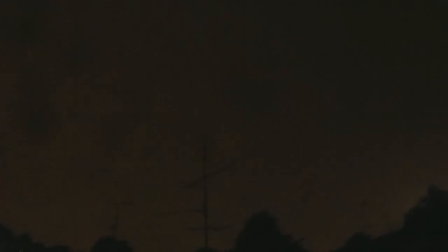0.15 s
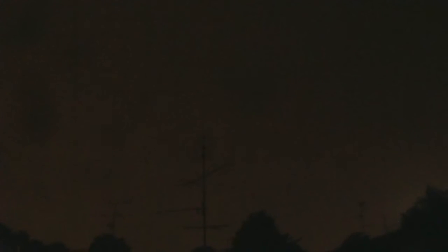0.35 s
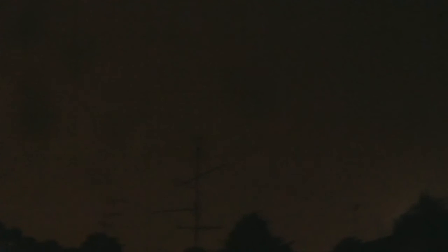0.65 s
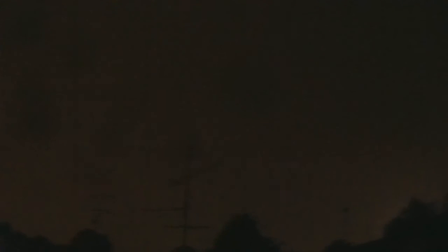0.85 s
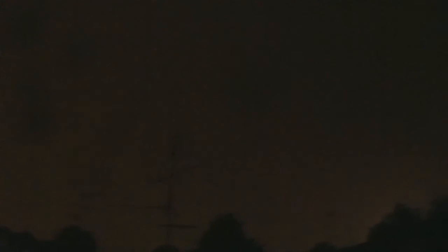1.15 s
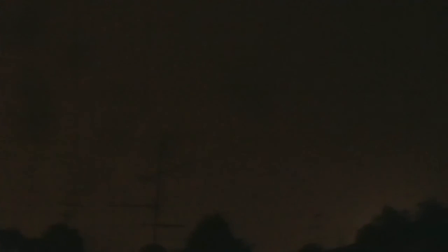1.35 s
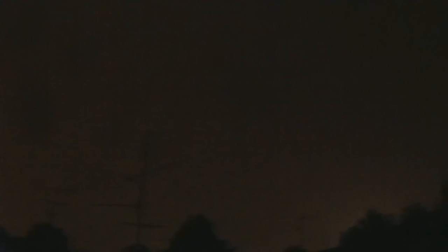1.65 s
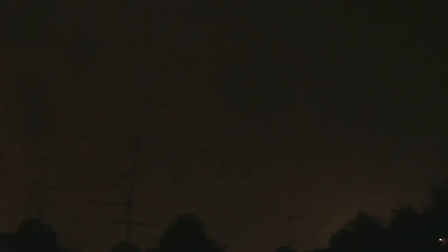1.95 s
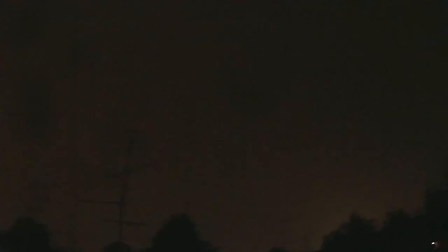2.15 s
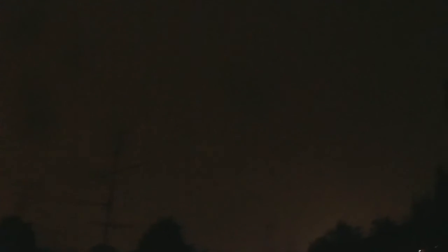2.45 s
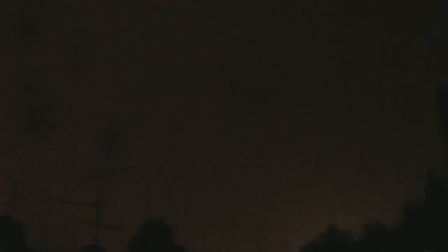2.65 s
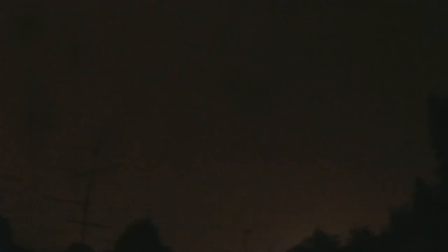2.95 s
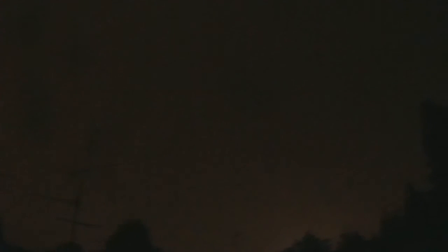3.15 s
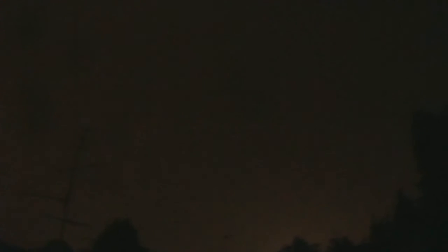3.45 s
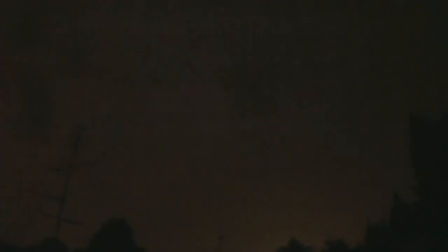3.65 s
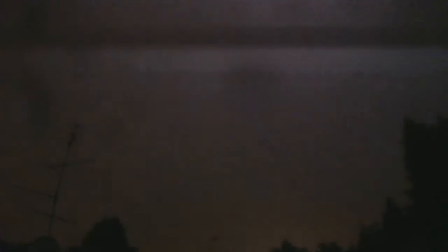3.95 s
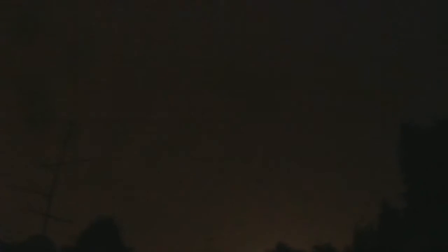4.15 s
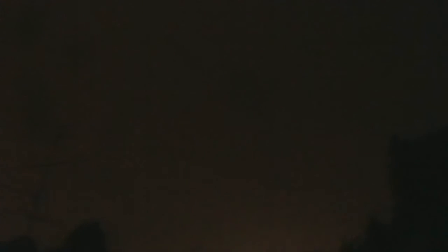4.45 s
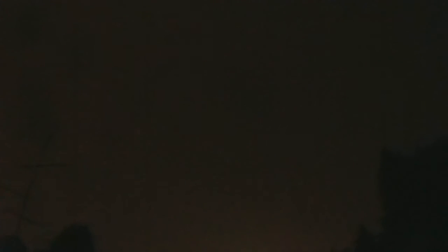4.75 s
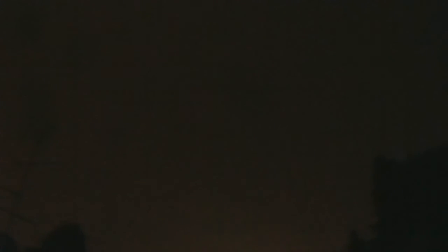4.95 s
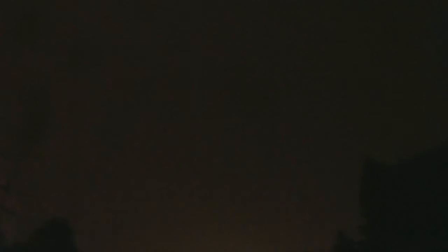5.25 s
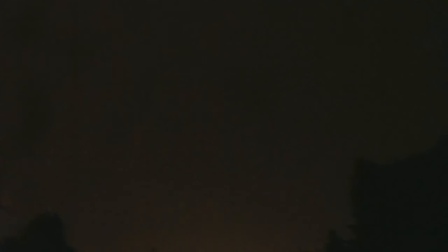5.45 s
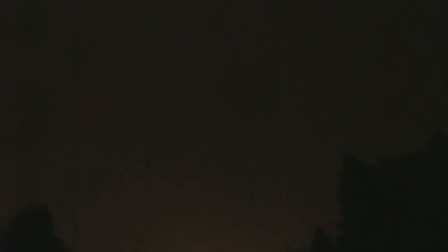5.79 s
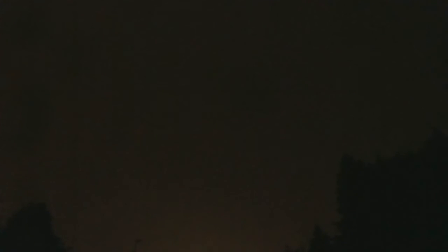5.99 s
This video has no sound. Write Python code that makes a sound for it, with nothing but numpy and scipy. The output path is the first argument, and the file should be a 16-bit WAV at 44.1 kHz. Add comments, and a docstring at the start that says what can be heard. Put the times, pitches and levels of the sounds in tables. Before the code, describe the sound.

Distant thunder grumbles beneath an even wash of rain on trees and rooftops. The thunder builds through a cluster of low thuds, peaks about halfway, then slowly fades as the rain grows a little stronger. Now and then a close drop strikes the windowsill with a sharp, briefly ringing tick. It is all picked up at a window at night by a small camera microphone.

```python
"""Night rain from a window, hissing in the trees and drumming on roofs, with far thunder rolling under it.
The hiss is a wash of tiny noise bursts; the roofs blend into a drone. The thunder is three bands of low
noise, dotted with short booms that crowd together near the middle. Single drops tick on the sill and
make it ring. A small camera picks it all up, sampling at a low rate and holding each sample."""
import sys
import numpy as np
from scipy import signal
from scipy.fft import rfft, irfft, next_fast_len
from scipy.io import wavfile
from scipy.ndimage import map_coordinates

SR = 44100
rng = np.random.default_rng(int(sys.argv[2]) if len(sys.argv) > 2 else 0)


def generate_wav(signal):
    """Clip the signal to [-1, 1] and save it as 16-bit WAV at the path in sys.argv[1]."""
    frames = np.transpose(np.atleast_2d(signal))
    scaled = np.clip(frames, -1, 1) * 32767
    pcm = np.round(scaled).astype(np.int16)
    wavfile.write(sys.argv[1], SR, pcm)


N = 269892


def amp(db):
    """dB to gain."""
    return 10 ** (np.asarray(db) / 20)


def unit(x):
    """x at rms 1."""
    return x / np.sqrt(np.mean(x ** 2, -1, keepdims=True) + 1e-20)


def faders(rows):
    """One fader curve, sample by sample, for each column after the time."""
    times, *columns = np.transpose(rows)
    return [np.interp(np.arange(N) / SR, times, column) for column in columns]


def wobble(rate):
    """A smooth random curve, rate knots a second."""
    knots = rng.standard_normal(int(N * rate / SR) + 4)
    return map_coordinates(knots, [np.arange(N) * rate / SR])


def coloured(x, eq):
    """x through an EQ of (frequency [Hz], gain [dB]) points on a log axis, at rms 1."""
    size = next_fast_len(x.shape[-1] + 8192)
    hz, db = np.transpose(eq)
    gain = amp(np.interp(np.log(np.fft.rfftfreq(size, 1 / SR) + 1), np.log(hz), db, -120, -120))
    return unit(irfft(rfft(x, size) * gain, size)[..., :x.shape[-1]])


def noise(eq, length=N):
    """Steady noise through an EQ, at rms 1."""
    return coloured(rng.standard_normal(length), eq)


def patter(rate, spread_db, burst_s, smooth):
    """Noise gated by rate uneven hits a second, over a steady bed with the smooth share of the power."""
    when, size = rng.random((int(rate * N / SR), 2)).T
    hits = np.bincount((when * (N - 1)).astype(int), amp(spread_db * size ** 2), N)
    gate = signal.lfilter([1], [1, -np.exp(-1 / (burst_s * SR))], hits)
    return np.sqrt(smooth + (1 - smooth) * unit(gate) ** 2) * rng.standard_normal(N)


# Rain faders: (time [s], hiss level [dB], drumming level [dB])
RAIN_LEVELS = [(0, -48, -33.5), (.34, -45.5, -37), (.43, -43, -30.5), (.56, -45, -35), (.76, -43, -30.5),
               (.95, -48.5, -34), (1.5, -49.5, -35.5), (2.5, -50, -35.5), (2.8, -50, -33.5),
               (3.2, -49.5, -36), (3.95, -49, -37), (4.35, -46, -34.5), (5.5, -45.5, -33),
               (5.9, -44.5, -32.5), (6.12, -44, -34.5)]
# Tone of the rain in the trees and on the roofs: (frequency [Hz], gain [dB])
TREE_EQ = [(500, -27), (900, 0), (1400, -5), (2000, -1.5), (2600, -13.5), (3500, -23.5), (5000, -32),
           (6500, -38.5), (14000, -42)]
ROOF_EQ = [(150, -34), (300, -9), (480, -5.5), (600, -0.5), (720, 1.5), (850, -8), (1000, -16.5),
           (1400, -28.5)]


def rain():
    """Gusts of rain swell the hiss in the trees and the drumming on the roofs together."""
    hiss_db, drum_db = faders(RAIN_LEVELS)
    gust = wobble(12)
    hiss = coloured(patter(rate=350, spread_db=7.5, burst_s=0.0026, smooth=0.66), TREE_EQ)
    drum = noise(ROOF_EQ)  # far roofs blend into a smooth drone
    flutter = wobble(25)
    return amp(hiss_db + 0.43 * gust + 1.03 * flutter) * hiss + amp(drum_db + 0.79 * gust) * drum


# Thunder faders: (time [s], grumble level [dB], rumble level [dB])
ROLL_LEVELS = [(0, -33, -33.5), (.14, -40.5, -40), (.4, -42, -41.5), (.8, -39, -42.5), (1.1, -38, -37),
               (1.82, -35, -36.5), (2.35, -35.5, -39), (2.65, -31.5, -31.5), (2.88, -29.5, -30),
               (3.05, -31.5, -36), (3.2, -36, -40.5), (3.85, -36.5, -38), (4.15, -39.5, -42),
               (4.45, -34, -41), (4.75, -36.5, -45), (5.2, -40.5, -39), (5.5, -43.5, -39.5),
               (6.12, -46.5, -46.5)]
# Fader of the deepest thunder: (time [s], level [dB])
SUB_LEVELS = [(0, -51), (.85, -60), (1.5, -53), (2.1, -42), (2.8, -38), (3.3, -49.5), (4.6, -50),
              (5.6, -48), (6.12, -57)]
# Tone of the thunder's three registers: (frequency [Hz], gain [dB])
GRUMBLE_EQ = [(150, -8.5), (200, -5), (245, 4.5), (300, -9), (350, -3.5), (420, -9.5), (485, 0), (540, -15),
              (700, -12), (900, -22), (1300, -55)]
RUMBLE_EQ = [(45, -25), (75, -8), (112, 0), (135, -6), (160, -2), (200, -13), (280, -35)]
SUB_EQ = [(22, -44), (33, -8), (45, -2), (58, -7), (75, -22), (110, -44)]


def thunder_roll():
    """Far thunder rolls as a lumpy low-mid grumble and bass rumble over a smooth sub."""
    grumble_db, rumble_db = faders(ROLL_LEVELS)
    sub_db, = faders(SUB_LEVELS)
    grumble = coloured(patter(rate=35, spread_db=-2, burst_s=0.012, smooth=0.8), GRUMBLE_EQ)
    rumble = coloured(patter(rate=28, spread_db=10, burst_s=0.015, smooth=0.84), RUMBLE_EQ)
    return amp(grumble_db) * grumble + amp(rumble_db) * rumble + amp(sub_db) * noise(SUB_EQ)


# Tone of the noise floor: (frequency [Hz], gain [dB])
MIC_EQ = [(2000, -16), (3500, -2), (6000, -5), (10000, -4), (14000, -1.5)]


def mic_hiss():
    """The microphone's own faint, steady hiss."""
    return amp(-70.5) * noise(MIC_EQ)


# Boom cues: (time [s], thud peak [dB], starting pitch [Hz], clatter relative to thud [dB])
BOOM_CUES = [(0.126, -27, 245, -5), (0.981, -34.5, 152, 5), (1.204, -23.5, 108.5, -15),
             (1.378, -29, 187, -20), (1.426, -27, 140, -21), (1.67, -23.5, 96.8, 0), (1.714, -27, 125, -15),
             (1.893, -26, 106, -6), (1.998, -19.5, 124.7, -12), (2.124, -18, 105.2, -6.5),
             (2.234, -23, 155, -7), (2.345, -20.5, 151.5, -17), (2.465, -28.5, 236, -19),
             (2.579, -23.5, 99.6, -9), (2.64, -19, 93, -5.5), (2.705, -24, 95, -6.5),
             (2.745, -30, 105, -16), (2.79, -18.5, 195, -9), (2.844, -21.5, 105.3, -5.5),
             (2.888, -21.5, 95, -8), (2.925, -26, 201, -6), (2.951, -26.5, 100, -8),
             (3.005, -28, 100.3, -4.5), (3.623, -33, 94.9, 4), (3.759, -28.5, 224, 0)]
# Tone of a boom's upper layer: (frequency [Hz], gain [dB])
CLATTER_EQ = [(250, 2), (400, -1), (620, 2), (780, -2), (950, -45), (1300, -50)]


def thunder_booms(attack_cycles=0.801, climb_octaves=0.16):
    """A boom's low thud arrives first, bending up by climb_octaves per attack time; dull clatter follows."""
    out, t = np.zeros(N + SR), np.arange(SR // 8) / SR
    swell = lambda peak_s: (t / peak_s) * np.exp(1 - t / peak_s)
    for start, db, hz, clatter_db in BOOM_CUES:
        attack_s = attack_cycles / hz
        waver = noise([(8, 0), (120, -1), (300, -28)], len(t))  # turbulent air bends the wave
        pitch = np.minimum(hz * 2 ** (climb_octaves * t / attack_s + 0.23 * waver), 700)
        thud = swell(attack_s) * np.sin(2 * np.pi * np.cumsum(pitch) / SR)
        clatter = swell(1.42 * attack_s) ** 2 * noise(CLATTER_EQ, len(t))
        out[round(start * SR):][:len(t)] += amp(db) * thud
        out[round((start + 1.1 * attack_s) * SR):][:len(t)] += amp(db + clatter_db) * clatter
    return out[:N]


# Drop cues: (time [s], tick level [dB], tick centre [Hz], knock pitch [Hz])
DROP_CUES = [(1.444, -42, 3600, 1300), (1.9883, -34, 3830, 1320), (2.077, -32, 4000, 2080),
             (3.527, -37, 3460, 1920), (4.0155, -29.5, 4120, 1270), (4.192, -44.5, 4000, 2010),
             (4.4896, -24, 3700, 820), (4.736, -30.5, 4170, 2080), (5.029, -33.5, 4200, 2140),
             (5.043, -42, 4000, 2480), (5.148, -46, 3000, 1600), (5.8287, -33.5, 3500, 2500),
             (6.0301, -22.5, 3400, 1346)]
# Tone of the tick: (frequency [multiple of tick centre], gain [dB])
TICK_EQ = [(.3, -25), (.5, -2), (.75, -1), (1, 4), (1.2, -10), (1.5, -18)]
# Ringing modes of the sill: (frequency [multiple of knock pitch], level [dB])
SILL_MODES = [(1, 6), (1.3, -15), (1.6, -6), (2.1, -16), (2.7, -9.5)]
# Tone of the bright spit on top: (frequency [Hz], gain [dB])
SPIT_EQ = [(5000, -21), (6500, -5), (9000, -1), (14000, -4)]


def sill_drops():
    """A near drop ticks, spits and knocks the spot of the sill that it hits."""
    out, t = np.zeros(N + SR), np.arange(SR // 16) / SR
    envelope = lambda attack_s, t60_s: amp(-60 * t / t60_s) * (1 - np.exp(-t / attack_s))
    snap = envelope(attack_s=0.00036, t60_s=0.0069)
    ring = envelope(attack_s=0.0015, t60_s=0.011)
    burst = lambda eq: unit(snap * noise(eq, len(t))) * np.sqrt(np.mean(snap ** 2))
    for start, db, tick_hz, knock_hz in DROP_CUES:
        tick = burst(np.multiply(TICK_EQ, [tick_hz, 1]))
        knock = sum(amp(mode_db + rng.normal(0, 1)) * np.sin(2 * np.pi * knock_hz * ratio * t)
                    for ratio, mode_db in SILL_MODES)
        knock_db = 8.5 - 9 * np.log2(knock_hz / 1000)  # deeper-pitched spots sound louder
        spit = amp(-14.5) * burst(SPIT_EQ)
        out[round(start * SR):][:len(t)] += amp(db) * (tick + spit + amp(knock_db) * ring * knock)
    return out[:N]


def scene():
    """The mono mix at the microphone."""
    return (rain() + thunder_roll() + thunder_booms() + sill_drops() + mic_hiss())[None]


# Notch of the microphone opening: (centre [Hz], half-width [Hz], depth [dB])
PORT_NOTCH = (3470, 70, -8)
# The camera's steep high cut: (frequency [Hz], gain [dB])
HIGH_CUT = [(13470, 0), (13560, -14), (13640, -24), (13740, -30)]
CAMERA_RATE_HZ, TOP_HZ = 32004.2, 13740


def record(dry):
    """The camera's slower clock holds each sample until the next, mirroring the bass into the treble."""
    held_at = np.floor(np.arange(N) * CAMERA_RATE_HZ / SR) * SR / CAMERA_RATE_HZ
    steps = map_coordinates(dry[0], [held_at], mode="nearest")
    hz = np.fft.rfftfreq(N, 1 / SR)
    centre_hz, half_width_hz, depth_db = PORT_NOTCH
    notch = amp(depth_db / (1 + ((hz - centre_hz) / half_width_hz) ** 2))
    high_cut = amp(np.interp(hz, *np.transpose(HIGH_CUT))) * (hz < TOP_HZ)
    return irfft(rfft(steps) * notch * high_cut, N)[None]


dry = scene()
out = record(dry)
generate_wav(out)
```